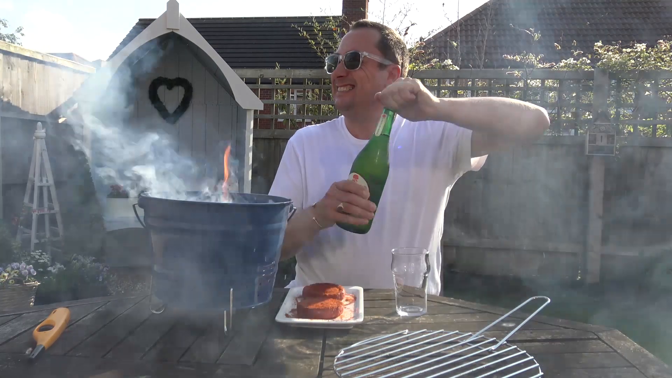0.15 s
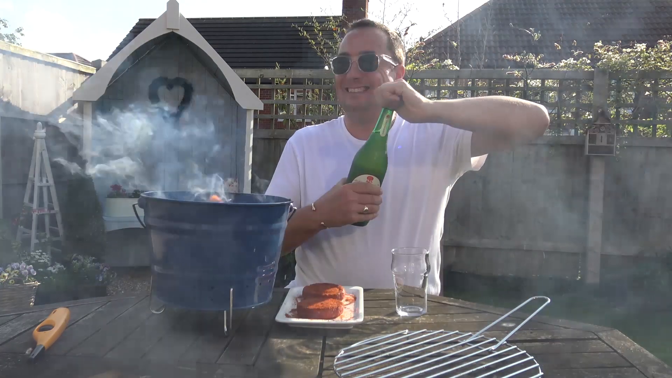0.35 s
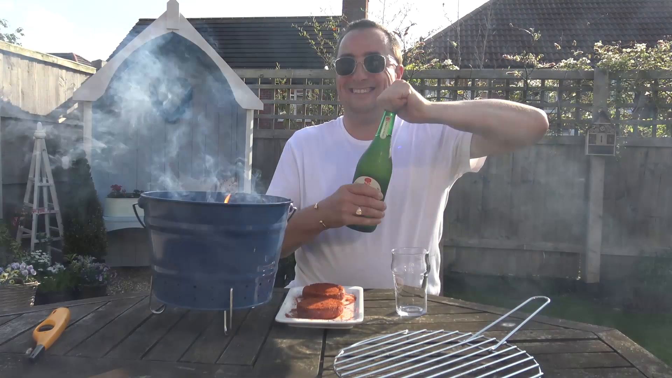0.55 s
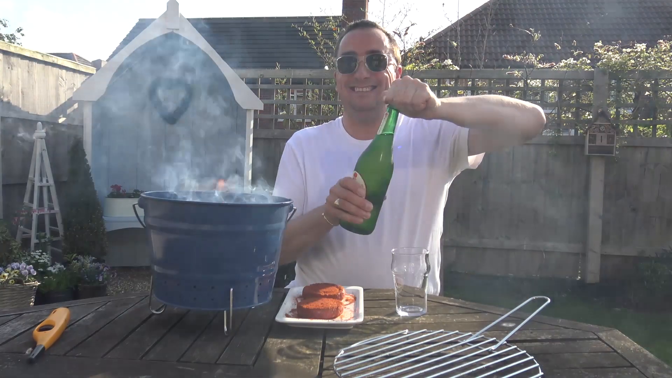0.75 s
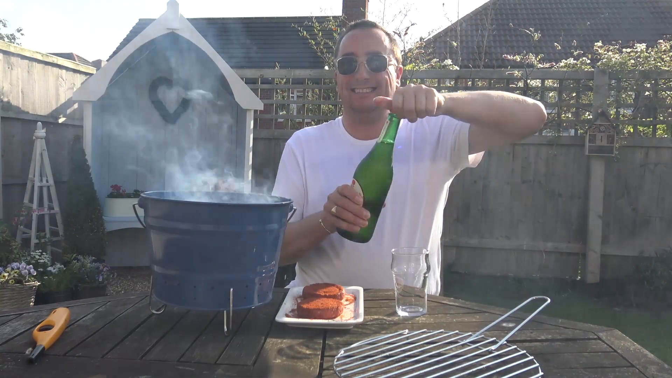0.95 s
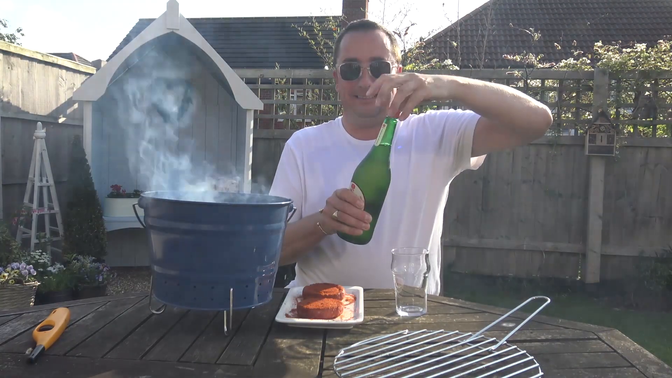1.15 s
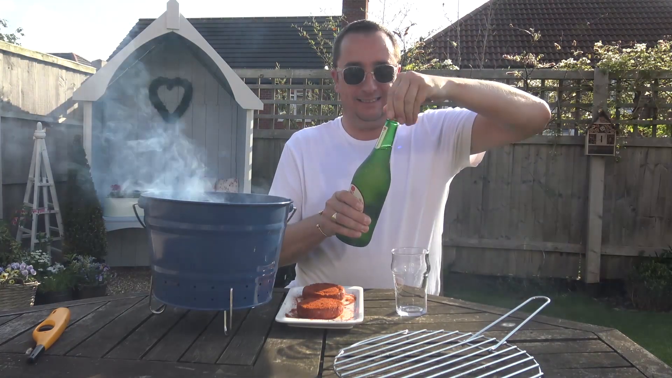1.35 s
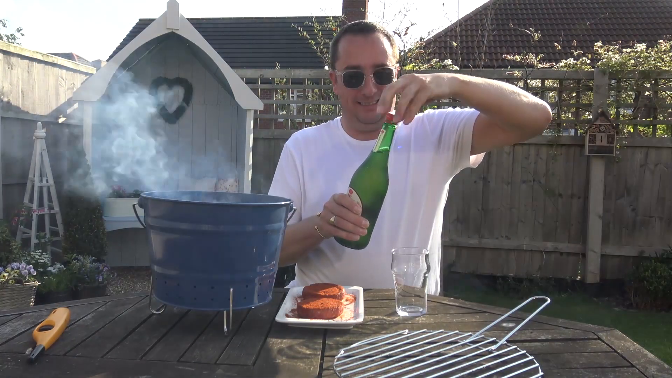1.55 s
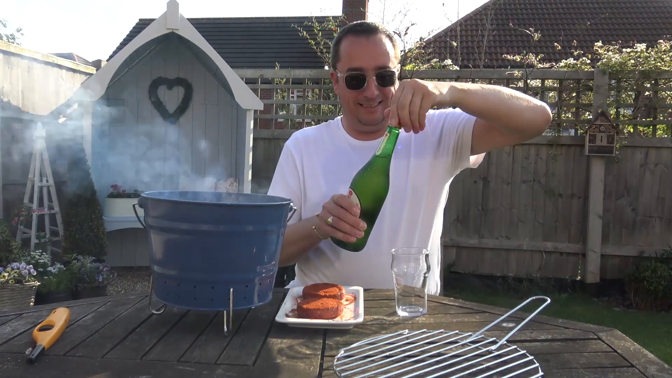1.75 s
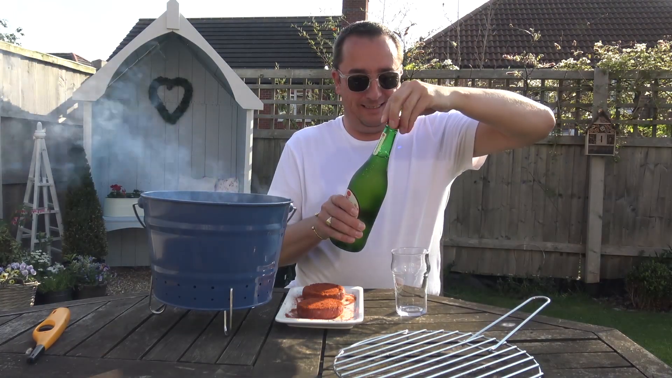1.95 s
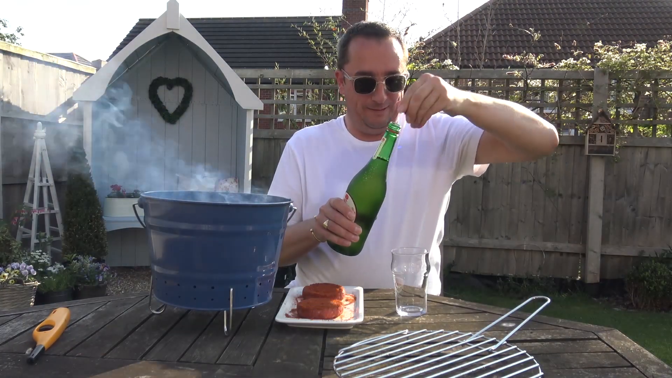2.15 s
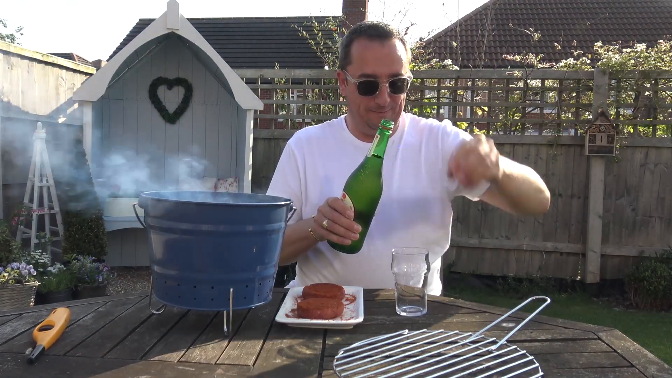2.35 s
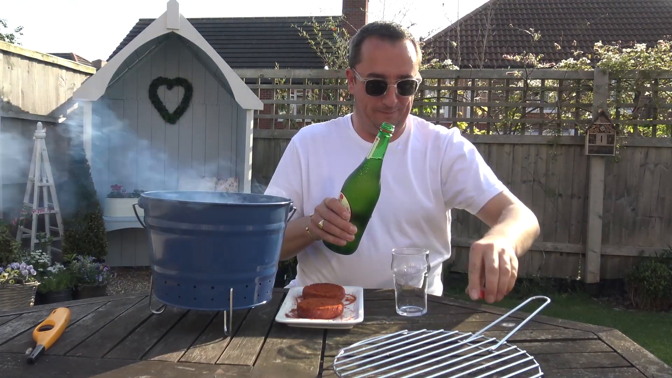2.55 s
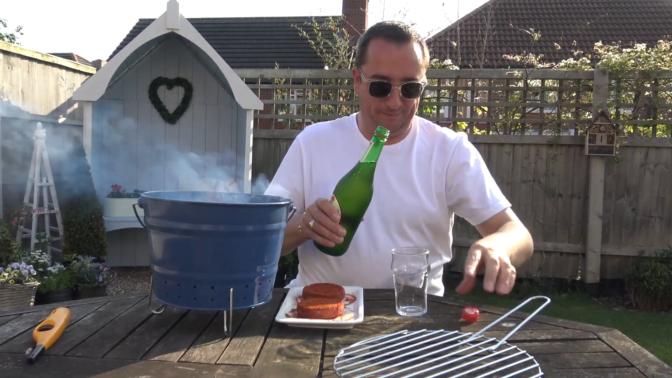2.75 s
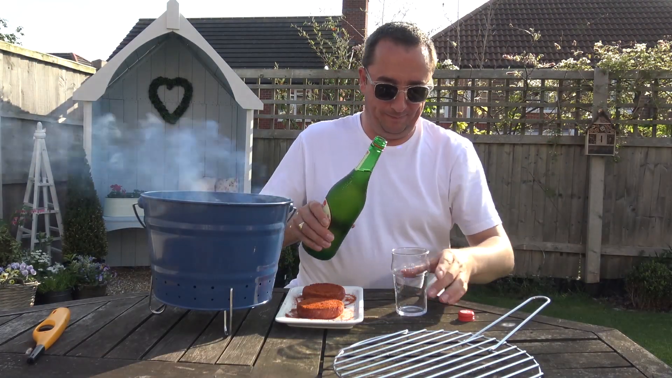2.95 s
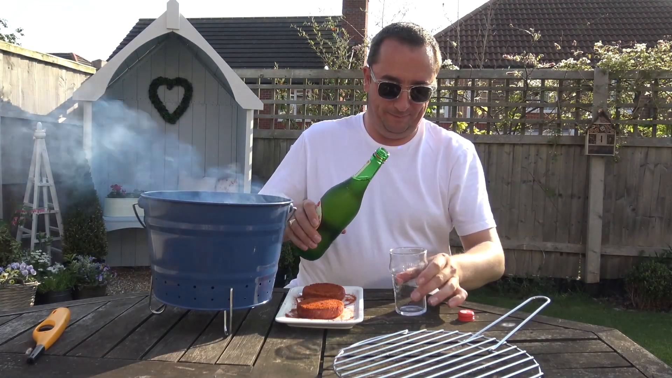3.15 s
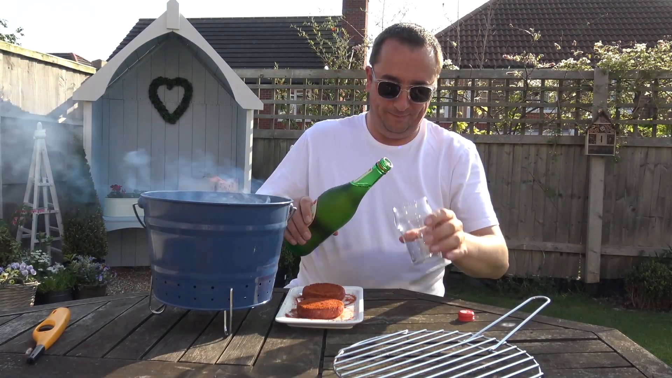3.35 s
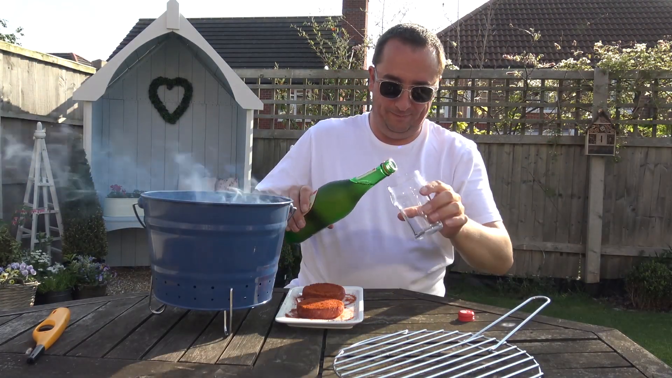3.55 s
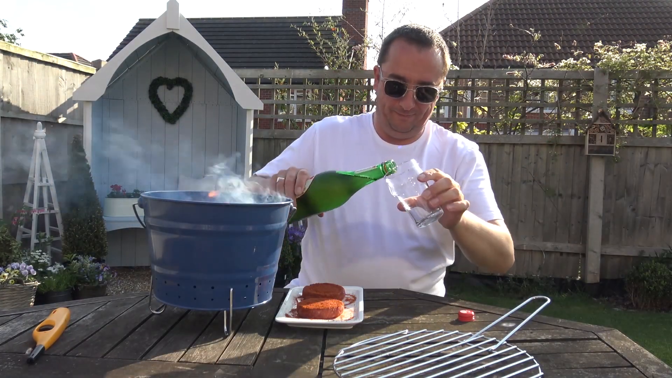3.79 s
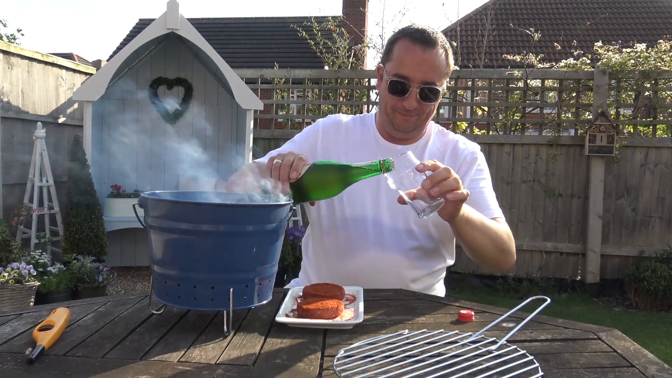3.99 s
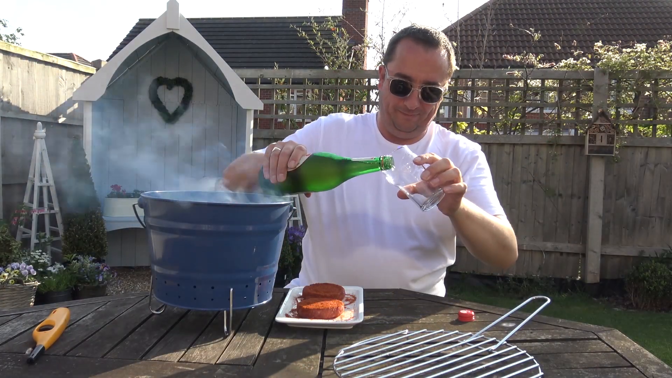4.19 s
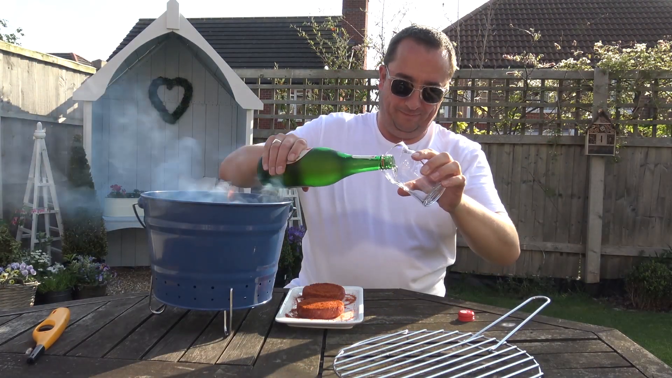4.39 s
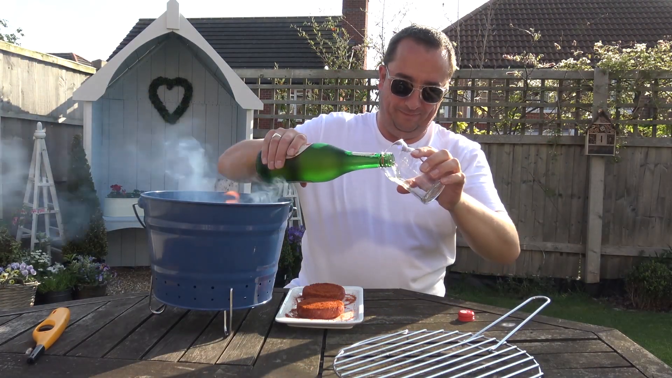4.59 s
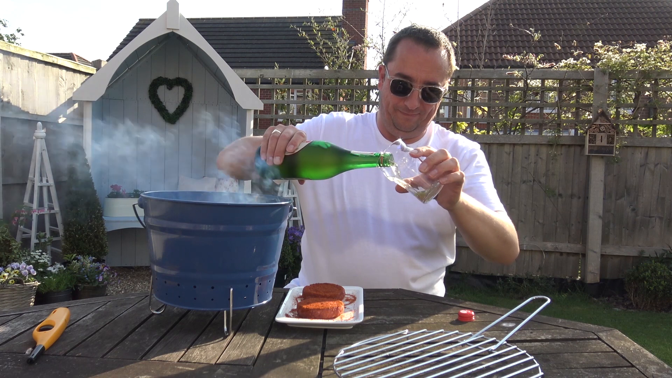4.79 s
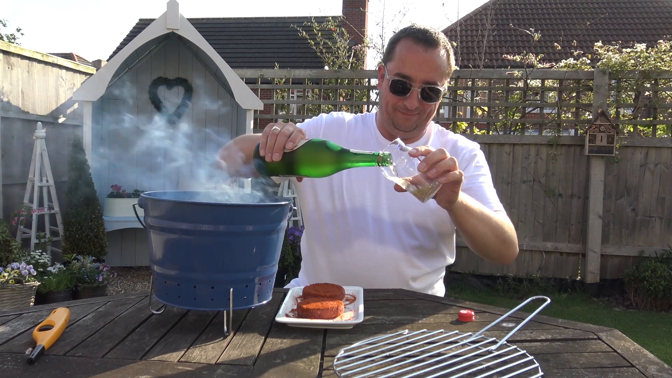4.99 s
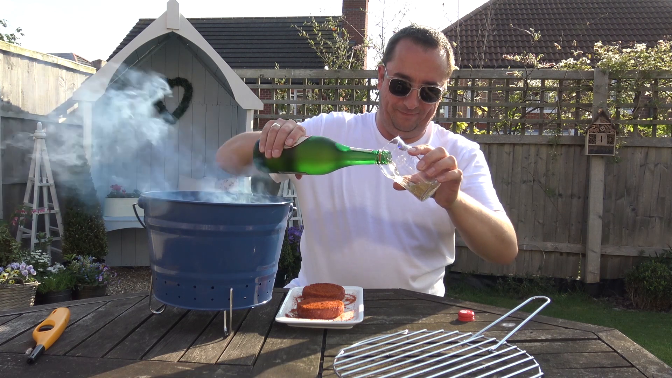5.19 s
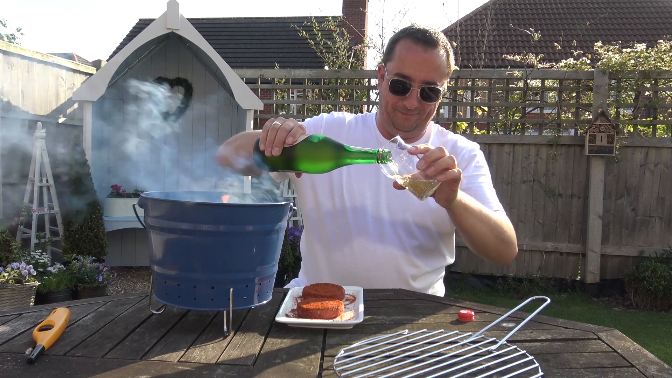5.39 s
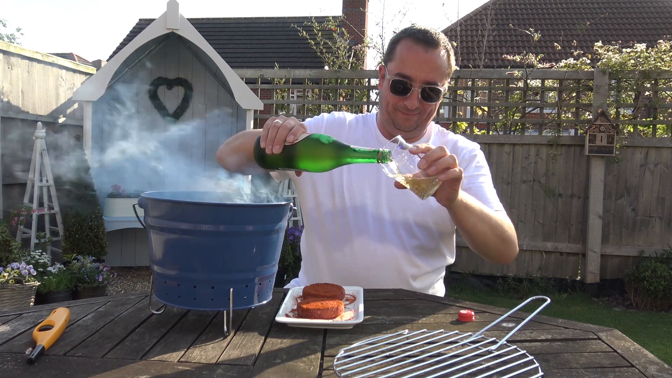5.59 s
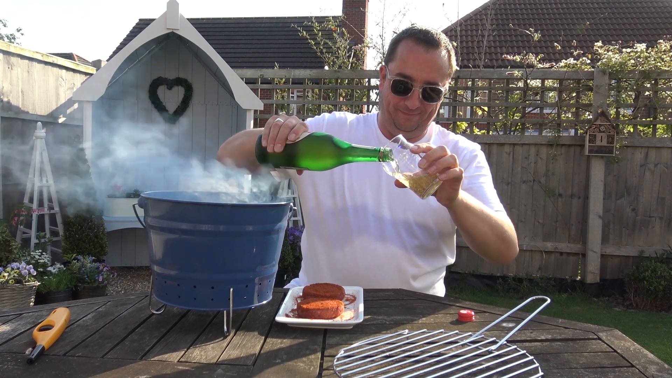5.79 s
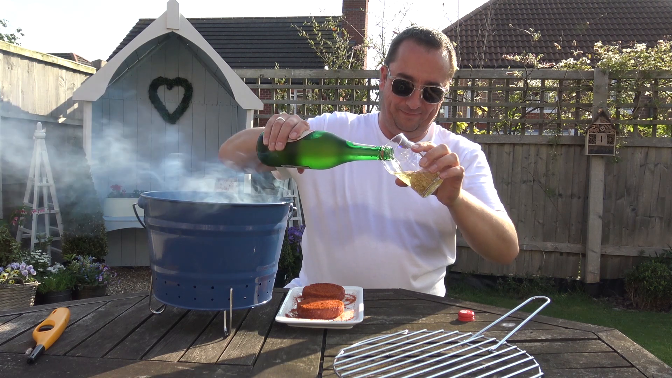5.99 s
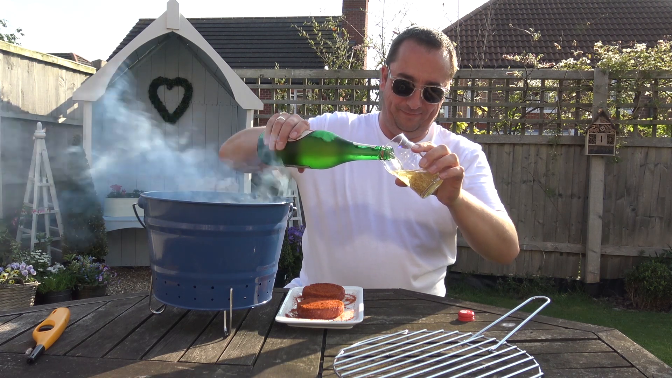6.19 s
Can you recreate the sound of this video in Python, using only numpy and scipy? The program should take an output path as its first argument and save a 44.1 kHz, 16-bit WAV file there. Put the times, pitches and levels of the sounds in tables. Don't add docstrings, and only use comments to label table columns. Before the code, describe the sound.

In a quiet garden with wind rumble, soft fire pops and distant chirps, gas hisses from a glass bottle. Its metal cap seal snaps in a quick run, the cap scrapes and ticks along the thread, comes free, and bounces tinnily on a wooden table. The bottleneck clinks twice in rapid chatters against a glass, then liquid pours in separate gulps. Close microphone, light fence echo.

```python
import sys
import numpy as np
from scipy import signal
from scipy.fft import rfft, irfft, next_fast_len
from scipy.io import wavfile
from scipy.ndimage import map_coordinates

SR = 44100
rng = np.random.default_rng(int(sys.argv[2]) if len(sys.argv) > 2 else 0)


def generate_wav(sig):
    pcm = np.round(np.clip(np.atleast_2d(sig).T, -1, 1) * 32767).astype(np.int16)
    wavfile.write(sys.argv[1], SR, pcm)


def nominal_scale(level):
    x = np.asarray(level, float) / 20
    return 10 ** x


N = 275184
AGE = np.arange(SR // 3) / SR

# (pitch [Hz], level [dB], t60 [s])
BOTTLE = [(2826, 10, 0.41), (5120, -7.5, 0.14), (3750, -24, 0.136), (4600, -21.5, 0.15), (2040, -12, 0.071),
          (760, -10.5, 0.044)]


def unit(x):
    return x / np.sqrt(np.mean(x ** 2) + 1e-20)


def along(points, hz):
    f, v = np.transpose(points)
    return np.interp(np.log(hz + 1), np.log(f + 1), v)


def curves(rows):
    s, *cols = np.transpose(rows)
    return [nominal_scale(np.interp(np.arange(N) / SR, s, c, -200, -200)) for c in cols]


def wobble(rate, step=16):
    at = np.arange(0, N + step, step)
    knots = rng.standard_normal(int(N * rate / SR) + 4)
    return np.interp(np.arange(N), at, map_coordinates(knots, [at * rate / SR]))


def filtered(x, response):
    m = next_fast_len(len(x) + 4096)
    return irfft(rfft(x, m) * response(np.fft.rfftfreq(m, 1 / SR)), m)[:len(x)]


def peak(f, hz, width_hz):
    return 1j * f * width_hz / (hz * hz - f * f + 1j * f * width_hz)


def hiss(response, size=N):
    return unit(filtered(rng.standard_normal(size), response))


def add(track, s, sound):
    part = track[round(s * SR):][:len(sound)]
    part += sound[:len(part)]


def ring(modes, free, scatter_db, contact=0.00042, pull=lambda hz: 0 * AGE):
    t = AGE[:round(SR * free * max(m[2] for m in modes)) + 1]
    start = np.sin(np.pi / 2 * np.minimum(t / contact, 1)) ** 2
    tone = 0
    for k, (hz, db, t60) in enumerate(modes):
        decay = nominal_scale(db + scatter_db * rng.standard_normal() - 60 * t / (t60 * free))
        cycles = hz * t + k / 2 + pull(hz)[:len(t)]
        tone = tone + decay * np.sin(2 * np.pi * cycles)
    return np.pad(start * tone, (0, len(AGE) - len(t)))


def crack(colours_db, t60, tail_db):
    centres = [1600, 4010, 7930, 12460]
    widths = [0.22, 0.57, 0.16, 0.27]
    bands = 0
    for hz, w, db in zip(centres, widths, colours_db):
        bands = bands + nominal_scale(db) * hiss(lambda f: np.exp(-(np.log((f + 1) / hz) / w) ** 2), size=len(AGE))
    decay = nominal_scale(-60 * AGE / t60) + nominal_scale(tail_db - 12 * AGE / t60)
    return bands * decay * (1 - np.exp(-AGE / 0.00035))


def clatter(peaks, low_hz, high_hz):
    def response(f):
        edges = 1 / (1 + (f / high_hz) ** 10) / (1 + (low_hz / (f + 1)) ** 10)
        return edges * sum((-1) ** k * nominal_scale(db) * peak(f, hz, w) for k, (hz, w, db) in enumerate(peaks))
    return hiss(response, size=len(AGE))


def air():
    # (time [s], level [dB])
    gusts = [(0.0, -50.5), (1.22, -47), (1.36, -32), (1.82, -47), (1.93, -32.5), (2.36, -48.5), (3.01, -29),
             (3.3, -40.5), (3.51, -30), (3.94, -43.5), (4.0, -32.5), (4.48, -32), (4.57, -22), (4.8, -35.5),
             (5.68, -45), (5.74, -31.5), (6.01, -49.5), (6.24, -32)]
    # (frequency [Hz], level [dB per Hz])
    buffet_colour = [(2.9, -19), (5.0, 11.5), (21, 0.5), (33, -12.5), (70, -33.5), (91, -62), (150, -120)]
    # (time [s], level [dB])
    hum_level = [(0.0, -49), (0.31, -52), (2.05, -51), (2.38, -53), (2.82, -51.5), (3.08, -53),
                 (4.83, -50.5), (6.24, -52)]
    # (frequency [Hz], level [dB per Hz])
    hum_colour = [(29, -19), (50, -3.5), (106, -15.5), (420, -19.5), (934, -19.5), (1700, -28.5),
                  (2910, -37.5), (16200, -50.5)]
    # (time [s], pitch [Hz], level [dB])
    engine = [(0, 36.2, -42), (.45, 35.1, -38.5), (.7, 33, -52.5), (.9, 32, -73)]
    hum = hiss(lambda f: nominal_scale(along(hum_colour, f)) * (1 + 0.5 * abs(peak(f, 8000, 810))))
    hum = curves(hum_level)[0] * nominal_scale(3.0) * hum
    murmur = filtered(hum, lambda f: (f > 130) / (1 + (f / 1500) ** 4))
    hum = hum + (nominal_scale(0.77 * wobble(14)) - 1) * murmur
    s, hz, db = np.transpose(engine)
    turns = np.cumsum(np.interp(np.arange(N) / SR, s, hz)) / SR
    motor = curves(np.c_[s, db])[0] * np.sin(2 * np.pi * turns)
    buffet = unit(nominal_scale(3.2 * wobble(4.0)) * hiss(lambda f: nominal_scale(along(buffet_colour, f))))
    return curves(gusts)[0] * buffet + hum + motor


def fire():
    # (time [s], peak level [dB], thump [dB])
    pops = [(0.16, -29, -27), (0.434, -34, -13), (0.624, -32.5, -3), (0.695, -35.5, -8), (0.761, -35, -2),
            (0.867, -28, -35), (1.066, -35, -26), (1.072, -27.5, -3), (1.179, -30, -19), (1.528, -30, -15),
            (1.771, -34, -30), (1.865, -34, -32), (2.514, -30.5, -25), (2.576, -33.5, -15),
            (2.608, -30.5, -10), (2.629, -34, -10.5), (2.727, -33.5, 1), (3.069, -38, -25),
            (3.377, -28.5, -0.5), (3.602, -34.5, -5), (3.733, -34.5, -26.5), (3.8, -36, -6.5),
            (4.663, -33.5, 2.5), (5.18, -34, -27), (5.191, -27, -10), (5.534, -35.5, -6),
            (5.75, -36.5, -20), (5.878, -33.5, -6), (5.988, -34.5, -26)]
    out, kicks = np.zeros(N), np.zeros(N)
    push = nominal_scale(-7.0) * (AGE / 0.00023) * np.exp(1 - AGE / 0.00042)
    for s, db, thump_db in pops:
        hz = 455.7 * (1 + 0.096 * rng.standard_normal())
        hollow = [(hz, -1.5, .03), (2.044 * hz, -14, .015), (190, thump_db - 6.0, .04)]
        add(out, s, nominal_scale(db) * (push + ring(hollow, 2.2, 1.6, contact=0.0013)))
    when, size = rng.random((250, 2)).T
    kicks[(when * (N - 1)).astype(int)] = nominal_scale(-8 + 15 * size ** 2)
    return out + filtered(kicks, lambda f: (peak(f, 438, 180) + 0.71 * peak(f, 210, 90)) / (1 + 1j * f / 750) ** 3)


def birds():
    # (time [s], length [s], start pitch [Hz], end pitch [Hz], level [dB])
    whistles = [
        (0.462, 0.1, 5300, 4300, -66),
        (1.18, 0.075, 5250, 4400, -65),
        (2.598, 0.16, 3130, 2780, -59),
        (2.202, 0.42, 3460, 3370, -71),
        (2.637, .05, 4800, 4500, -69),
        (2.982, .032, 3000, 4650, -66),
    ]
    # (time [s], start pitch [Hz], end pitch [Hz], level [dB], sweeps [count])
    chirps = [
        (0.555, 4600, 3600, -52, 6.1),
        (3.008, 4790, 3750, -48.5, 4.6),
        (3.46, 3300, 2900, -59, 3),
        (5.725, 4800, 3840, -55, 5),
    ]
    out = np.zeros(N)
    calls = [(*w, 2.5) for w in whistles]
    for s, start_hz, end_hz, db, sweeps in chirps:
        for k in range(round(1.6 * sweeps)):
            late = rng.random()
            shift = 140 * rng.standard_normal() - 55 * k
            calls.append((s + 0.008 * (k + 1.5 * late), 0.0238, start_hz + shift, end_hz + shift, db - 6.0, 1))
    for s, length, start_hz, end_hz, db, bend in calls:
        u = np.arange(round(length * SR)) / (length * SR)
        pitch = end_hz + (start_hz - end_hz) * (1 - u) ** bend
        add(out, s, nominal_scale(db) * np.sin(np.pi * u) ** 0.55 * np.sin(2 * np.pi * np.cumsum(pitch) / SR))
    return out * nominal_scale(1.8 * wobble(45) + 4.1 * wobble(250))


def yard(x, echo_db, tail_db):
    # (frequency [Hz], t60 [s])
    decay = [(300, 0.54), (3000, 0.32), (8000, 0.22), (15000, 0.039)]
    hz, t, z = signal.stft(rng.standard_normal(SR // 3), SR, nperseg=256)
    tail = signal.istft(z * nominal_scale(-60 * t / along(decay, hz)[:, None]), SR, nperseg=256)[1]
    tail = tail / np.linalg.norm(tail)
    echo_s = .0145
    echo = filtered(x, lambda f: peak(f, 7700, 11000) ** 2 * np.exp(-2j * np.pi * f * echo_s))
    return x + nominal_scale(echo_db) * echo + nominal_scale(tail_db) * signal.fftconvolve(x, tail)[:N]


def grind():
    # (time [s], level [dB])
    slides = [
        [(4.05, -62), (4.065, -33), (4.1, -38), (4.135, -39), (4.16, -59)],
        [(4.306, -44), (4.315, -31), (4.34, -39.5), (4.365, -59.5)],
    ]
    # (time [s], level [dB])
    jolt = [(3.99, -70), (4.03, -45), (4.12, -50), (4.25, -56.5), (4.38, -49.5), (4.45, -70)]
    level = sum(curves(slide)[0] for slide in slides)
    grains = nominal_scale(3 * wobble(350))
    rough = grains * hiss(lambda f: peak(f, 2050, 450) ** 2 - 0.62 * peak(f, 2900, 600) ** 2
                          + .35 * peak(f, 5000, 1100) ** 2 + 0.35 * peak(f, 810, 200) ** 2)
    return level * unit(rough) + curves(jolt)[0] * hiss(lambda f: peak(f, 68, 40) ** 2)


def pouring():
    # (time [s], note level [dB], pitch [Hz], spray [dB])
    gulps = [
        (4.5233, -29, 1510, -60.5),
        (4.7944, -24.5, 1570, -58),
        (5.0654, -20.5, 1600, -60),
        (5.339, -32, 1660, -58),
        (5.619, -25, 1776, -45),
        (5.905, -24.5, 2123, -61),
        (6.2152, -41.5, 2025, -62),
    ]
    # (time [s], note level [dB], pitch [Hz], spray [dB])
    slops = [
        (5.4125, -41.5, 2246, -57),
        (5.5644, -44, 2140, -69.5),
        (5.672, -31.5, 2260, -57),
        (5.7183, -44, 2200, -56),
        (5.834, -44.5, 2480, -65),
        (5.871, -41, 2260, -59),
        (6.013, -40.5, 2460, -58),
    ]
    # (time [s], peak level [dB], pitch [Hz])
    drips = [(4.786, -45, 5370), (5.303, -45.5, 3730), (5.431, -46, 5140), (5.5553, -54, 7020),
             (5.734, -40, 4500), (5.8711, -39.5, 6170), (5.891, -43, 4010), (5.929, -54.5, 3370),
             (5.9585, -48.5, 4490), (6.123, -49.5, 3650)]
    # (time [s], level [dB])
    foam = [(4.38, -70), (4.5, -61), (5.1, -67.5), (5.35, -81)]
    out = np.zeros(N)
    hold = np.exp(-(AGE / 0.011) ** 3)
    taps = [(*g, -33.5, -18.5) for g in gulps] + [(*s, -71, -11.5) for s in slops]
    for s, db, hz, spray_db, thud_db, upper_db in taps:
        fizz_db = spray_db - db
        spread = 1 + 0.042 * rng.standard_normal(2)
        low_modes = [(hz, -3, .08), (1.267 * hz, -12, .05), (740, thud_db - db + 2.0, .08)]
        high_modes = [(3750 * spread[0], upper_db, .04), (5500 * spread[1], fizz_db + 2.5, .03)]
        note = hold * ring(low_modes, 0.55, 0.14, contact=0.0017)
        upper = ring(high_modes, 0.8, 2.5, contact=.0007)
        spray = crack([-30, upper_db - 11, fizz_db, fizz_db - 13.5], 0.045, -26)
        add(out, s, nominal_scale(db) * (note + upper + spray))
    for s, db, hz in drips:
        add(out, s, nominal_scale(db) * ring([(hz, -1.5, .025), (3.2 * hz, -7, .015)], 0.85, 1.28, contact=0.0011))
    fizz = nominal_scale(2.14 * wobble(540)) * hiss(lambda f: peak(f, 5330, 590) ** 2 + peak(f, 2960, 1800) ** 2)
    return out + curves(foam)[0] * unit(fizz)


def clinks():
    # (time [s], peak level [dB], glass over bottle [dB], joint over bottle [dB], joint pitch [Hz])
    contacts = [(4.0187, -4.5, -1, 3, 749), (4.0433, -10.5, 5.5, 6.5, 732), (4.0589, -8, 0, -1.5, 750),
                (4.068, -14, 5, -2.5, 735), (4.076, -12.5, -5.5, 2.5, 710), (4.0837, -16, 0.5, 4, 730),
                (4.096, -19, 0.5, 1.5, 720), (4.107, -23, 2, 4.5, 720), (4.114, -26, -3, 7, 710),
                (4.1211, -22, 3.5, 0.5, 747), (4.131, -30, 0.5, 7.5, 770), (4.14, -25, -8, 7.5, 715),
                (4.149, -34, 7, 9, 730), (4.3072, -5, 4, -3, 772), (4.3105, -2.5, -3.5, -14, 713),
                (4.314, -12.5, 8.5, -1, 720), (4.319, -5.5, -0.5, -7, 662), (4.325, -11.5, 6, 1, 704),
                (4.329, -16, 4, 0, 684), (4.334, -11.5, -1.5, 5.5, 712), (4.34, -11.5, -10, -6.5, 773),
                (4.347, -19, -1, -33, 770), (4.357, -25, 1, 1, 806), (4.373, -31.5, -21, -13, 760)]
    # (pitch [Hz], level [dB], t60 [s])
    tumbler = [(1992, 1, .3), (1912, -14, .1), (1789, -20, .12), (2500, -19, .12), (3870, -25, .1),
               (4180, -23, .12), (4385, -12, .3), (4640, -25, .12), (6170, -27, .2), (11760, -29, .06),
               (12330, -24, .07), (13130, -33, .05), (14490, -35, .08)]
    # (pitch [Hz], level [dB], t60 [s])
    tilted = [(710, -15.5, 0.27), (1176, -31, 0.14), (2690, -26, 0.12), (2832, -2, .25), (5177, -5, .11),
              (2930, -13, 0.17), (2920, -19.5, 0.086), (5060, -13, 0.11), (7100, -28.5, 0.13),
              (7950, -13, 0.068)]
    # (time [s], pitch [Hz])
    pressure = [
        [(4.018, 1992), (4.095, 1992), (4.118, 2045), (4.145, 2065), (4.17, 1995)],
        [(4.306, 2015), (4.322, 2060), (4.345, 2115), (4.366, 2180), (4.385, 2090)],
    ]
    # (time [s], level [dB], modes (pitch [Hz], level [dB], t60 [s]))
    parted = [
        (4.152, -44.5, [(1995, -5, 0.33), (4390, -2, 0.59), (2810, -3, 0.33)]),
        (4.375, -49, [(2020, -8, 0.34), (2930, -8, 0.46), (5200, 3, 0.31), (7940, -11, .3)]),
    ]
    out, times = np.zeros(N), np.transpose(contacts)[0]
    for s, db, glass_db, joint_db, joint_hz in contacts:
        firm = s > 4.25
        both = list(tilted)
        for hz, level, t60 in tumbler:
            dulled_db = firm * -3.5 * (4000 - hz) / 2000 * (hz < 7000)
            both.append((hz, glass_db + level + dulled_db, t60))
        joint = [(joint_hz, joint_db - 2.5, 0.071), (2070 * (joint_hz / 740) ** 0.77, -12.5 + 7 * firm, 0.071)]
        pressed = [(hz, 240, level) for hz, level, t60 in both]
        strongest_hz = np.interp(s + AGE, *np.transpose(pressure[int(firm)]))
        lift = np.cumsum(strongest_hz - tumbler[0][0]) / SR

        def pull(hz):
            higher = firm * (hz < 7000) * (0.6 * lift + 80 * AGE)
            return (lift if hz < 2100 else higher) * any(hz == mode[0] for mode in tumbler)

        next_contacts = times[(times > s) & (times < s + .2)]
        choke = nominal_scale(-8 * sum(np.clip((AGE - later + s) / 0.0056, 0, 1) for later in next_contacts))
        vessels = ring(both, 0.54 if firm else 0.65, 1.9, contact=0.000091 * nominal_scale(-.9 * db), pull=pull)
        struck = choke * (vessels + ring(joint, 0.93, 0, contact=0.00075))
        touch = nominal_scale(db - 14 + 5.1 * firm - 60 * AGE / 0.019) * clatter(pressed, 460, 13000)
        add(out, s, nominal_scale(db - 7.0) * struck + touch)
    for s, db, modes in parted:
        add(out, s, nominal_scale(db) * ring(modes, 0.52, 0, contact=.008))
    return filtered(out, lambda f: (1j * f / (420 + 1j * f)) ** 3 * 0.98)


def cap_drop():
    # (time [s], peak level [dB], wood under it [dB], metal edge under it [dB], blow colour [Hz])
    bounces = [
        (2.7776, -3, -18, -19.5, 4000),
        (2.818, -12.5, -11, -32, 4250),
        (2.864, -9, -13.5, -35, 3600),
        (2.8803, -8, -27, -27, 3100),
        (2.9242, -31, -25, -9, 3000),
        (2.9267, -8.5, -25.5, -28.5, 2850),
        (2.9484, -34, -8, -15, 2100),
        (2.9531, -28, -12, -23, 2700),
        (2.9675, -35, -11, -19, 2100),
    ]
    board_colours = [617, 1030, 1150, 800, 900, 910, 897, 900, 900]
    # (pitch [Hz], width [Hz], level [dB])
    shell = [(1560, 270, -3.5), (2065, 99, -1.5), (2750, 650, 2.5), (3300, 350, 1), (3810, 300, -2.5),
             (4250, 330, 0), (5730, 620, -9)]
    # (pitch [Hz], level [dB], t60 [s])
    edge = [(6710, 2, 0.076), (13200, -4.5, 0.079), (12300, -17.5, .05), (15160, -15.5, 0.051)]
    # (pitch [Hz], width [Hz], level [dB])
    boards = [(382, 51, 0), (490, 70, -3), (670, 120, -5), (815, 40, -0.5), (1128, 95, -1),
              (1850, 280, 0.5)]
    out = np.zeros(N)
    rattle_decay = nominal_scale(-6.5 - 60 * AGE / 0.026) + nominal_scale(-33 - 60 * AGE / 0.14)
    wood_decay = nominal_scale(-60 * AGE / 0.11) * (1 - np.exp(-AGE / 0.0024))
    for (s, db, wood_db, edge_db, face_hz), board_hz in zip(bounces, board_colours):
        struck = [(hz, level + (3 * db - 15) * np.log(hz / face_hz) ** 2, 3.1 / w) for hz, w, level in shell]
        loose = [(hz, w, level - 22 * np.log(hz / face_hz) ** 2) for hz, w, level in shell[1:-1]]
        knocked = [(hz, w, level - 12 * np.log(hz / board_hz) ** 2) for hz, w, level in boards]
        rattle = rattle_decay * clatter(loose, 900, 4100)
        wood = wood_decay * clatter(knocked, 330, 2000)
        blow = ring(struck, 1.1, 1.5)
        add(out, s, nominal_scale(db - 0.5) * blow + nominal_scale(db) * rattle + nominal_scale(db + wood_db + 1.0) * wood)
        add(out, s, nominal_scale(db + edge_db + 3.5) * ring(edge, 0.44, 1.5, contact=0.00082))
        add(out, s, nominal_scale(db + edge_db - 5.5) * crack([-41, 0, 8.5, -22], 0.01, -30))
    return out


def gas():
    # (time [s], level [dB])
    puffs = [
        [(0.0, -32.5), (0.09, -26.5), (0.2, -37.5), (0.33, -52), (0.45, -67.5)],
        [(0.64, -63), (0.81, -40), (0.864, -43), (1.002, -56), (1.1, -74)],
    ]
    # (pitch [Hz], width [Hz], level [dB])
    gaps = [(3323, 570, -19), (4800, 590, -7.5), (6284, 460, -2), (8070, 322, 0.5), (9300, 620, -12.5),
            (11500, 804, -15), (12615, 1000, -9), (13970, 900, -14)]
    swelling = [.01, -.05, 0.71, .3, 0.13, 0.017, 0.051, .05]
    # (frequency [Hz], level [dB per Hz])
    jet_colour = [(710, -65), (1200, -23.5), (4040, -21), (6100, -13), (7820, -8.5), (10100, -14.5),
                  (12300, -21), (16000, -19.5)]
    level = sum(curves(puff)[0] for puff in puffs)
    whistling = 0
    for (hz, w, db), grows in zip(gaps, swelling):
        flutter = nominal_scale(db + 2.1 * wobble(11.1) + 1.8 * wobble(70))
        swell = (level / nominal_scale(-31.5)) ** grows
        whistling = whistling + swell * flutter * hiss(lambda f: peak(f, hz, w) ** 2) / 4
    jet = nominal_scale(1.5 * wobble(300)) * hiss(lambda f: nominal_scale(along(jet_colour, f)))
    return level * (nominal_scale(7.5) * whistling + nominal_scale(-3.5) * jet)


def seal_snaps():
    # (time [s], bottle level [dB], crack over it [dB], extra bite at 4 kHz [dB])
    snaps = [
        (0.6423, -0.5, -1, 1.5),
        (0.697, -1, 3.5, -2),
        (0.736, -5.5, 5.5, 6),
        (0.78, -2.5, 1.5, -0.5),
        (0.8119, -2, 4.5, -0.5),
        (0.8492, 5.5, -5, 6),
    ]
    # (low crack [dB], top crack [dB], favoured mode [Hz])
    bridges = [(-0.5, 5, 3200), (-1.5, -2, 8900), (-1.5, 4, 6900), (-10, -2, 5200), (5, -9.5, 2800),
               (4, 4, 4630)]
    snap_colour = [-27.5, -17.5, -8.5, -15.5]
    # (pitch [Hz], level [dB], t60 [s])
    skirt = [(1542, 0.5, 0.016), (4090, -19, .06), (4673, -5, 0.0492), (5200, -2, 0.042),
             (6900, 0.5, 0.037), (8400, -2, 0.03535), (8910, -4.5, 0.0259)]
    out = np.zeros(N)
    held = [(hz, level / 4, t60) for hz, level, t60 in BOTTLE]
    for (s, db, over, bite), (low_db, top_db, side_hz) in zip(snaps, bridges):
        colours = over + np.add(snap_colour, [low_db, bite, 0, top_db])
        jolted = [(hz, level + 5 - 9 * abs(np.log(hz / side_hz)) ** .5, t60) for hz, level, t60 in skirt]
        add(out, s, nominal_scale(db + 8.0) * crack(colours, 0.0064, -24.0))
        add(out, s, nominal_scale(db - 31.5) * ring(held, 0.22, 1.6))
        add(out, s, nominal_scale(db + over - 19.5) * ring(jolted, 0.72, 1.4))
    return out


def thread_ticks():
    # (time [s], bottle level [dB], crack over it [dB], brightness [dB per colour])
    ticks = [(0.355, -51.5, 18.5, -0.5), (1.0442, -30.5, -0.5, -2), (1.0616, -35, -3, -1),
             (1.2913, -35.5, 5.5, -1.5), (1.311, -28.5, -5, -0.5), (1.353, -40, 2, -2),
             (1.373, -24, -10, -10), (1.397, -42, 0, -4), (1.445, -27, -1.5, -15.5), (1.469, -28, -6, -18),
             (1.4867, -36, 6, -9), (1.5027, -37, 13, -8.5), (1.6797, -27, 8, -1.5), (1.682, -7.5, -10, 0.5),
             (1.716, -25, -7.5, -14), (1.7343, -16.5, -5, -3), (1.744, -21, -4, -1), (1.77, -37, 6, -1),
             (1.836, -38, 2, -3), (1.852, -42, -4, -5), (1.8594, -31, -6, 4), (1.866, -14, -1, 1.5),
             (1.876, -17, 3, 2.5), (1.918, -17, -7, 0), (1.986, -13.5, -1, 1), (1.9898, -5, 2.5, 0),
             (2.006, -24, -16, -1), (2.118, -21.5, -10, -4), (2.139, -21.5, -18, -11), (2.1531, -28, 2, -1),
             (2.163, -22, -1.5, -1), (3.213, -47.5, 9, -1.5)]
    tick_colour = [-12.5, -11.5, -10.5, -14.5]
    out = np.zeros(N)
    for s, db, over, bright in ticks:
        colours = over + np.add(tick_colour, bright * (np.arange(4) - 1))
        add(out, s, nominal_scale(db) * crack(colours, 0.016, -29.5) + nominal_scale(db - 21.5) * ring(BOTTLE, 0.185, 0.75))
    return out


def strokes():
    # (peak time [s], rise [s], fall [s], rub level [dB], looseness [dB])
    turns = [(1.051, 0.05, 0.021, -57, -2), (1.30, 0.018, 0.046, -56, 0), (1.385, 0.086, 0.056, -48, -26),
             (1.454, 0.08, 0.049, -44, -5.5), (1.5, 0.026, 0.031, -44.5, -3),
             (1.681, 0.0069, 0.024, -32.5, -9), (1.741, 0.058, 0.085, -38, -2.5),
             (1.877, 0.044, 0.014, -42, 14.5), (1.92, 0.046, 0.042, -55, 16.5),
             (2.005, 0.03, 0.012, -31, -5.5), (2.115, 0.06, 0.056, -47, 0), (2.162, .025, 0.028, -64, 0)]
    t, out = np.arange(N) / SR, 0
    for s, rise, fall, db, loose in turns:
        shape = nominal_scale(db - 41.5 * np.maximum((s - t) / rise, (t - s) / fall) ** 2)
        out = out + shape * nominal_scale(np.array([[0], [-1 + loose], [13 + 0.48 * loose]]))
    return out


def cap_rubbing():
    rub, fizz, sing = strokes()
    grain = nominal_scale(3.2 * wobble(400) + 1.2 * wobble(90))
    rasp = grain * hiss(lambda f: peak(f, 2180, 1790) ** 2 + 1.14 * peak(f, 3130, 920) ** 2
                        + 0.18 * peak(f, 5100, 800) ** 2)
    rustle = nominal_scale(4.5 * wobble(120)) * hiss(lambda f: peak(f, 7900, 1100) - 0.59 * peak(f, 9800, 440)
                                           + 0.24 * peak(f, 12500, 800) + 0.33 * peak(f, 6800, 500))

    def body(f):
        return sum((-1) ** k * nominal_scale(db) * peak(f, hz, 9 / t60) for k, (hz, db, t60) in enumerate(BOTTLE))

    singing = filtered(sing * rng.standard_normal(N), body) / np.std(filtered(rng.standard_normal(N), body))
    return unit(rasp) * rub * nominal_scale(3.0) + unit(rustle) * fizz * nominal_scale(-5.5) + nominal_scale(-7.5) * singing


def cap_leaves():
    # (time [s], level [dB], pitch [Hz], t60 [s])
    s, db, hz, t60 = (2.153, -35, 650, .16)
    out = np.zeros(N)
    swell = nominal_scale(db - 60 * AGE / t60) * (1 - np.exp(-AGE / 0.002))
    add(out, s, swell * np.sin(2 * np.pi * hz * (AGE + .5 * AGE ** 2)))
    add(out, s + 0.0073, nominal_scale(-39) * ring(BOTTLE, 0.74, 0.35))
    return out


def scene():
    outdoors = air() + fire()
    opening = gas() + seal_snaps() + thread_ticks() + cap_rubbing() + cap_leaves()
    raised = yard(opening, echo_db=-14, tail_db=-19)
    dropped = yard(cap_drop(), echo_db=-20.5, tail_db=-22.5)
    poured = yard(clinks() + pouring(), echo_db=-54, tail_db=-21)
    far_birds = yard(birds(), echo_db=-18.5, tail_db=-4.5)
    return (raised + dropped + poured + far_birds + outdoors + grind())[None]


def top_cut(x):
    return signal.sosfilt(signal.butter(12, 16390, fs=SR, output="sos"), x)


def record(dry):
    top_hz, roll_hz = 15900, 300
    mix = filtered(dry[0], lambda f: np.sin(np.pi / 2 * np.clip((top_hz - f) / roll_hz, 0, 1)) ** 2)[None]
    clipped = mix / (1 + np.abs(mix) ** 10) ** (1 / 10)
    return top_cut(clipped)


dry = scene()
out = record(dry)
generate_wav(out)
```